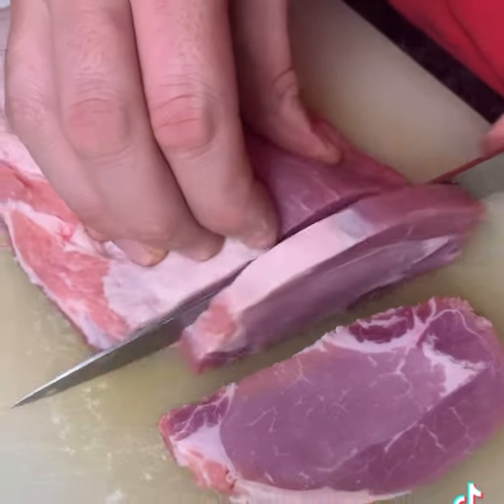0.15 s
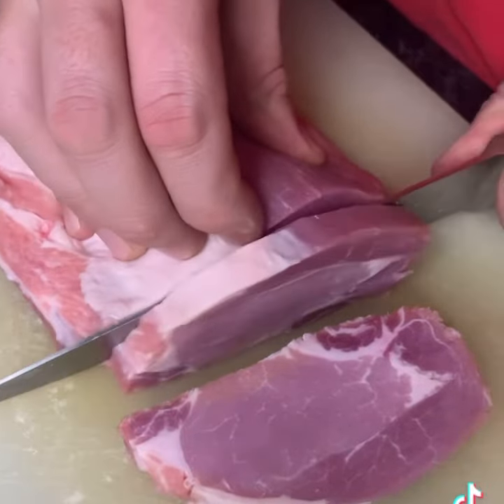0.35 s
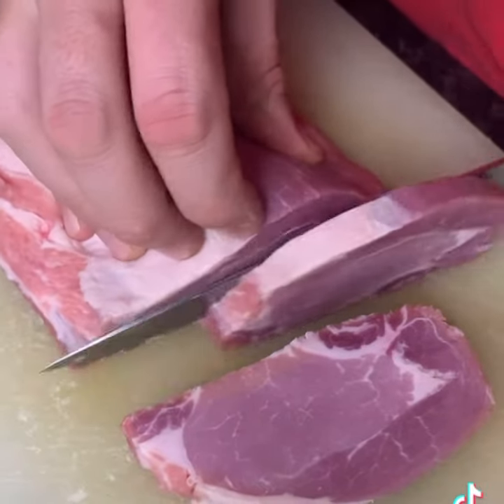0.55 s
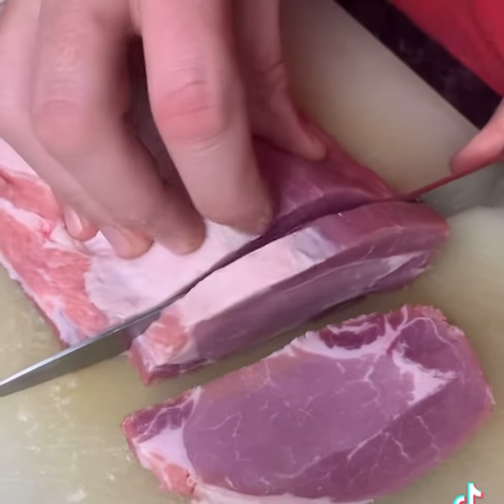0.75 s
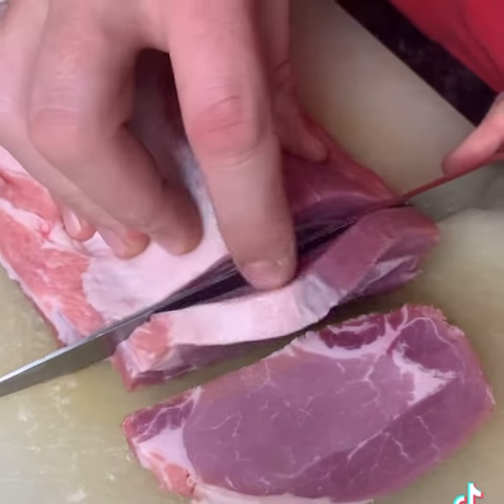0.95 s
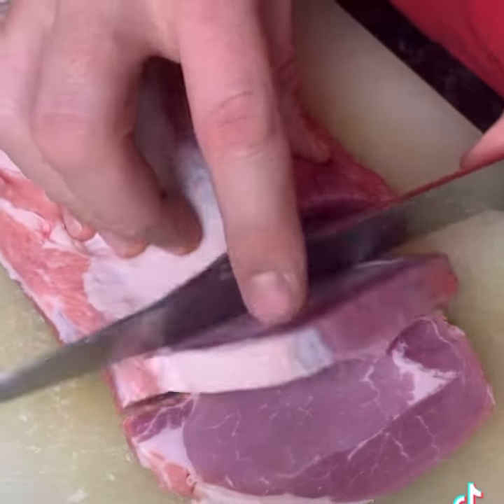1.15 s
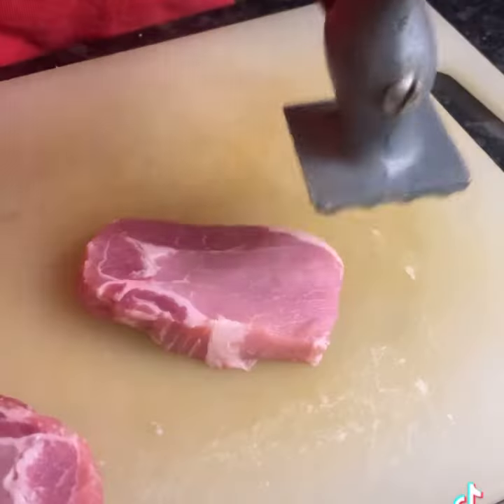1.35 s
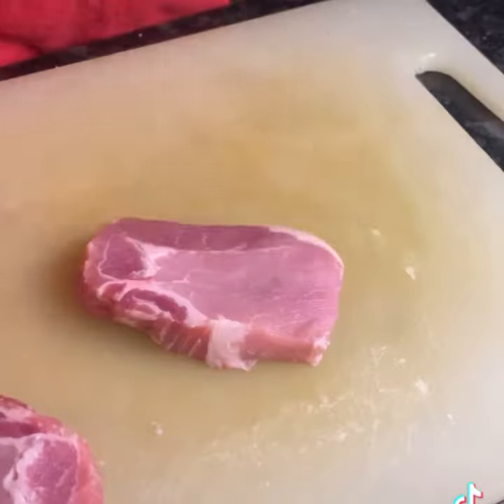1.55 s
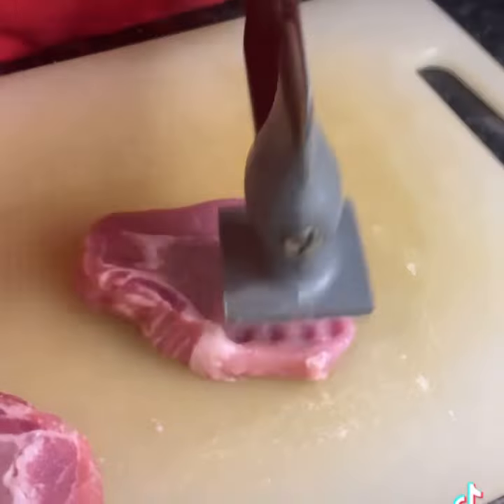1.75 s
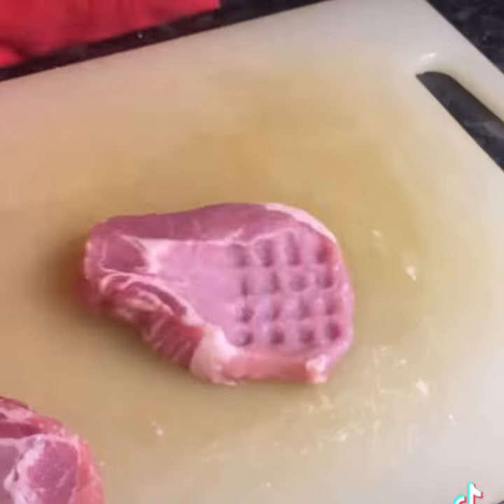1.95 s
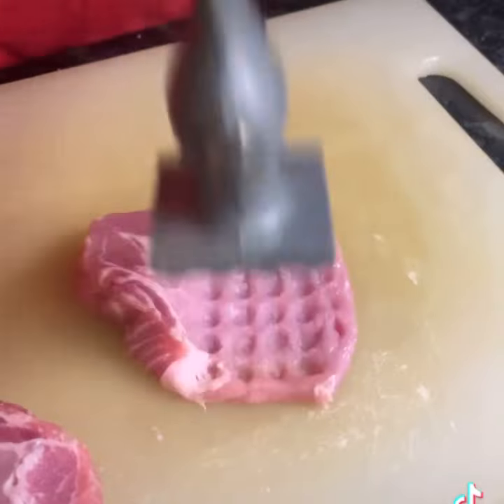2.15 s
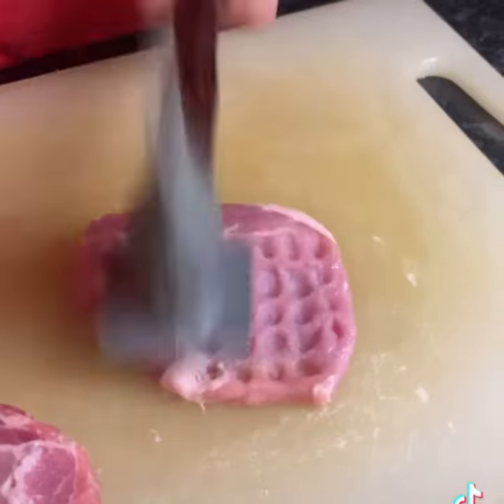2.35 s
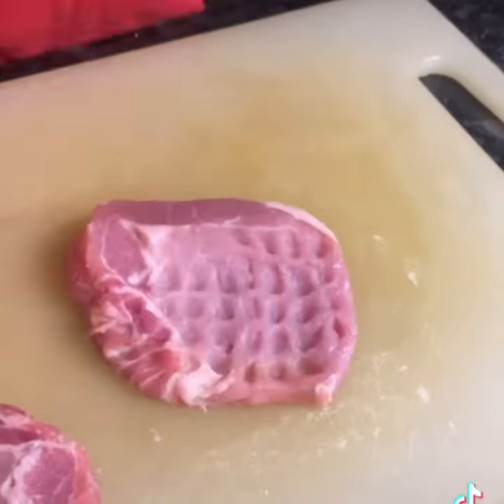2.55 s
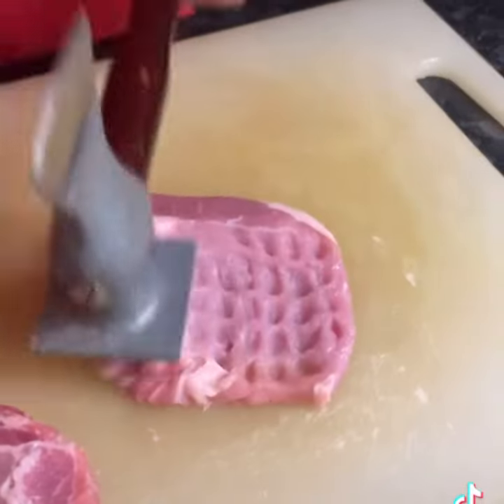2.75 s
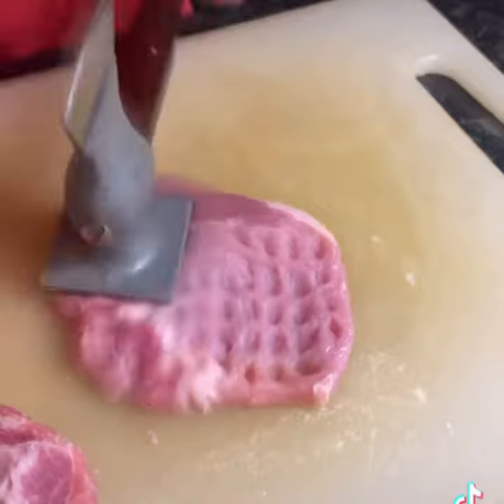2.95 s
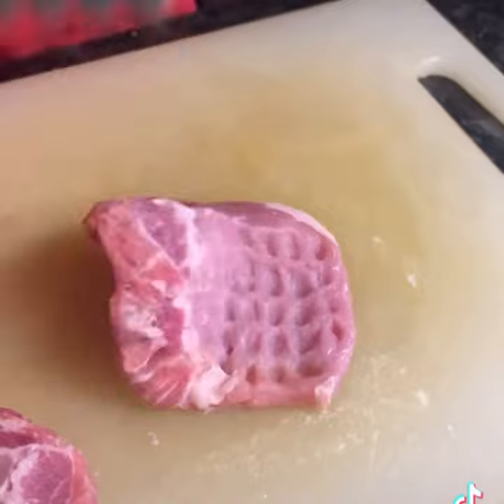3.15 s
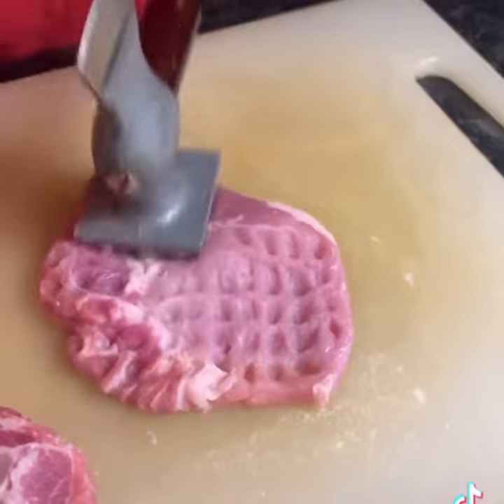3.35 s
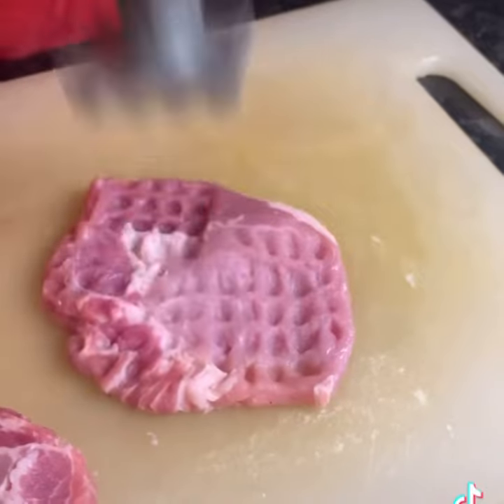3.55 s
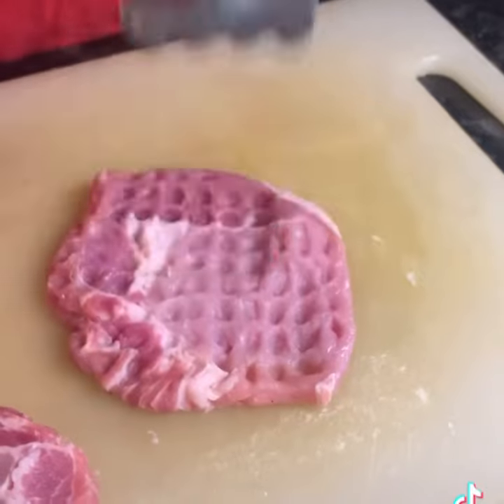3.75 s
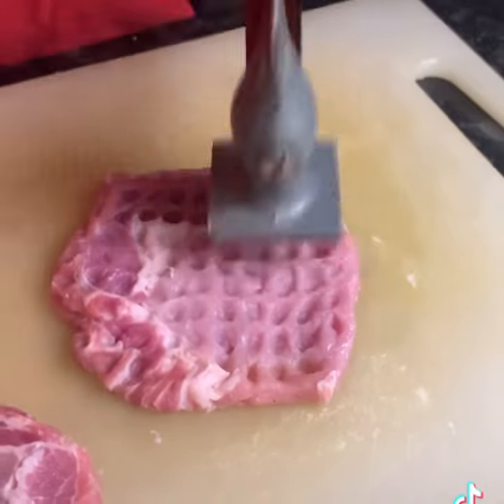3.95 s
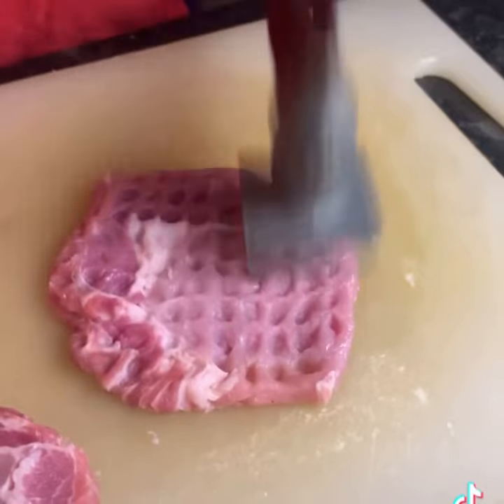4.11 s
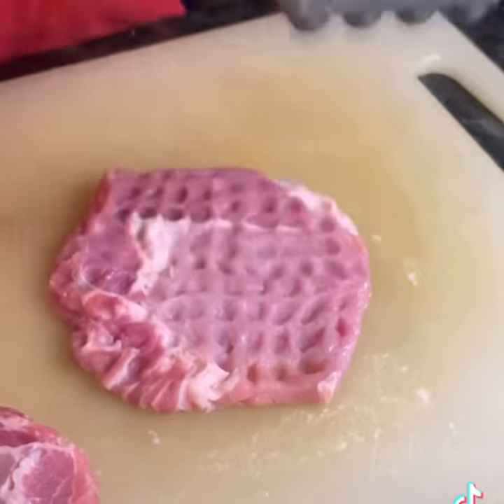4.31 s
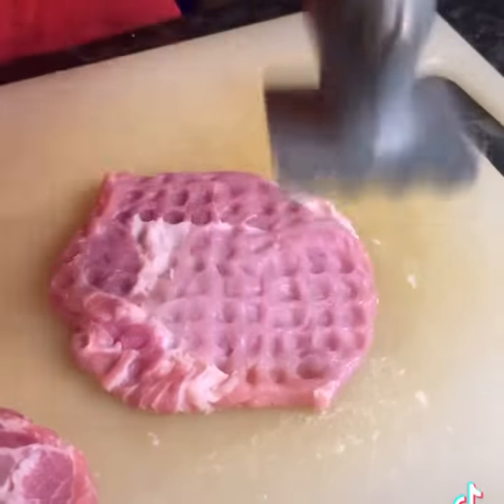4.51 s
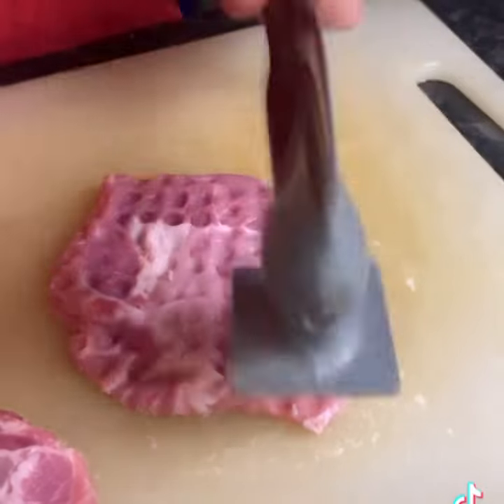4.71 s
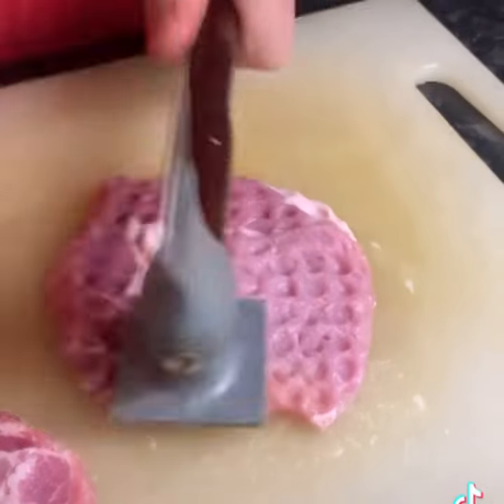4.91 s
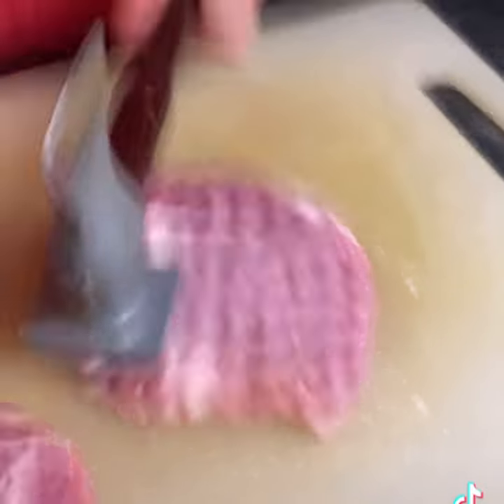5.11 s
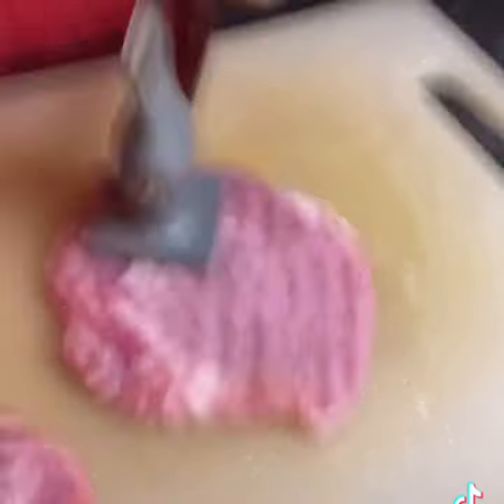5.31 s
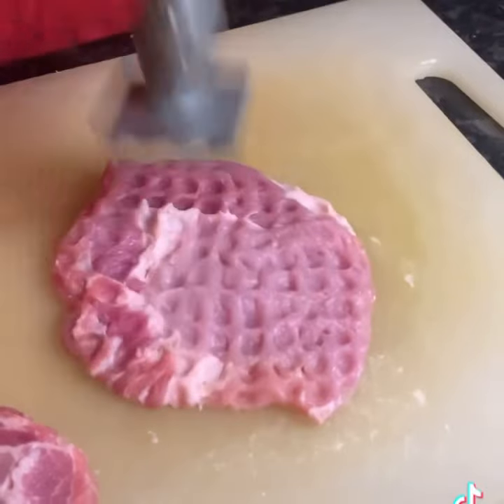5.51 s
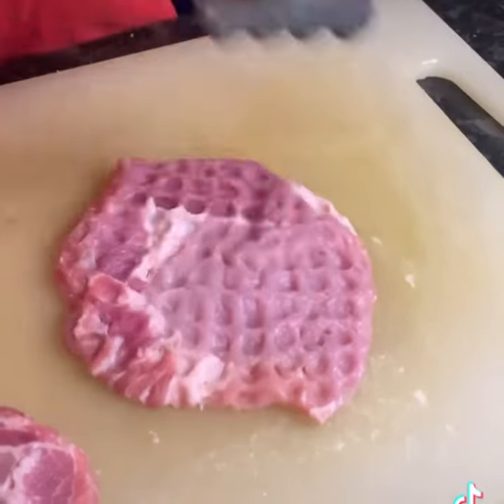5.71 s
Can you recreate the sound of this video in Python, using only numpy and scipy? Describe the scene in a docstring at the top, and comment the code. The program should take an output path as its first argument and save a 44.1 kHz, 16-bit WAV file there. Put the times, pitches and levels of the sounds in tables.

```python
"""In a small kitchen, a knife slices raw pork over a low hum; then a toothed metal mallet pounds it sixteen times.
Each blow adds shaped noise (lead-in, slap, juice), two short resonances (air pocket, board knock), damped modes
of the plastic board and counter, and a thump of falling pitch. Decaying noise supplies the kitchen's answer.
Two close microphone ports hear it; a limiter squashes the blows and pushes the hum down between them."""
import sys
import numpy as np
from scipy import signal
from scipy.fft import rfft, irfft, next_fast_len
from scipy.io import wavfile
from scipy.ndimage import uniform_filter1d, minimum_filter1d

SR = 44100
rng = np.random.default_rng(int(sys.argv[2]) if len(sys.argv) > 2 else 0)


def generate_wav(sig):
    """Save sig (samples, or channels by samples) to the path in sys.argv[1] as 16-bit PCM at SR."""
    pcm = np.round(np.clip(np.atleast_2d(sig).T, -1, 1) * 32767).astype(np.int16)
    wavfile.write(sys.argv[1], SR, pcm)


N = 258847
TIME = np.arange(N) / SR


# mallet blows; the spot where the head lands sets the meat and both pitches: (time [s], relative force [dB],
# thickness [0-1], juiciness [0-1], knock of the board [Hz], air pocket under the head [Hz])
BLOWS = [(1.5757, 12, 0.33, 0.28, 773.4, 1830), (1.9258, 14, 0.61, 0.36, 1018, 1317),
         (2.256, 8.5, 1, 0.09, 748.8, 1929), (2.5549, 14, 0.99, 0.01, 768.8, 1896),
         (2.8526, 15, 0.55, 0.41, 771, 1434), (3.1528, 13, 1, 0.47, 784.6, 1509),
         (3.4835, 15, 0.6, 0.4, 755, 2384), (3.7583, 14, 0.47, 0.41, 914.6, 1435),
         (4.022, 13.6, .15, .7, 716, 2143), (4.2773, 13, 0.19, 0.9, 901, 1458),
         (4.5237, 13.8, .15, .03, 715, 1326), (4.7577, 14, 0.39, 0.81, 759, 2093),
         (4.9913, 14, 0.95, 0, 772.3, 1469), (5.208, 12.5, 0.58, 0.98, 764, 1718),
         (5.4431, 12.5, 0.22, 0.48, 1009, 1217), (5.671, 13.5, 0.21, 0.83, 685, 2122)]
# parts of a blow on thin, dry meat: (relative level [dB], delay to peak [s], 60 dB rise [s], t60 [s])
# lead-in: noise that swells just before the slap
LEAD_IN = (-27, -.003, .038, .07)
FACE = (-4.7, .002, .01, .036)
POCKET = (-15, .002, .0155, .022)
KNOCK = (-7, .004, .02, .042)
JUICE = (-19, .0002, .0137, .057)
# spectrum of the slap and lead-in: (frequency [Hz], relative level per Hz [dB])
SLAP = [(150, -29), (260, -1), (420, -1.5), (800, 0), (1050, -4), (1300, -4), (1600, -4.5), (2100, -3),
        (2600, -6.5), (3300, -8), (4300, -8.5), (6500, -25), (12000, -55.5)]
# spectrum of spraying juice and wet ticks: (frequency [Hz], relative level per Hz [dB])
SPRAY = [(2000, -3), (4500, -9.5), (6500, 3), (9500, 0.5), (11500, -2), (13000, -12.5), (15000, -3.5),
         (16500, -31)]
# likeness of the two ports for the blows' direct sound: (frequency [Hz], correlation [-1 to 1])
ALIKE_DIRECT = [(300, 0.85), (800, 0.56), (1800, 0.653), (3500, 0.282), (5000, 0.926), (8500, 1)]
# gain change from thin to thick meat [dB]: heavier thump, stronger pocket, softer slap
THICK_THUMP_DB, THICK_POCKET_DB, THICK_SLAP_DB = 3, 11.5, -3
# blows on thick meat have a louder lead-in, and the meat shields the board [dB]
THICK_LEAD_IN_DB, THICK_BOARD_DB = 5.5, -4.5
# gain change from dry to juicy meat [dB]: more spray, a weaker knock
JUICY_SPRAY_DB, JUICY_KNOCK_DB = 5.5, -6.5
# the room throws the thump back
ECHO_S, ECHO_DB = .041, -18


def mallet():
    """Impact excitation: after a lead-in the face slaps, juice sprays, and board and counter take the blow."""
    out = np.zeros((2, N))
    t = np.arange(-SR // 25, SR // 3) / SR
    n = len(t)
    for s, force_db, thick, juicy, knock_hz, pocket_hz in BLOWS:
        lead_in = amp(THICK_LEAD_IN_DB * thick) * noise(SLAP, n, ALIKE_DIRECT) * burst(t, *LEAD_IN)
        slap = amp(THICK_SLAP_DB * thick) * noise(SLAP, n, ALIKE_DIRECT) * burst(t, *FACE)
        pocket = resonance(t, pocket_hz, port_spread=.49) * burst(t, *POCKET)
        pocket *= amp(THICK_POCKET_DB * thick)
        knock = resonance(t, knock_hz, port_spread=.47) * burst(t, *KNOCK)
        knock *= amp(JUICY_KNOCK_DB * juicy)
        # juice bursts out in tiny uneven spurts
        spray = uneven(n, depth_db=5.0, size=30) * noise(SPRAY, n) * burst(t, *JUICE)
        spray *= amp(JUICY_SPRAY_DB * juicy)
        # each port hears its own blend of the board's modes
        board = np.array([board_modes(t - .0045, scatter_db=1.85) for port in range(2)])
        board *= amp(THICK_BOARD_DB * thick - 16.5)
        counter = amp(-1.5) * counter_modes(t - .0013)
        low = amp(3.5) * thump(t - .00356) + amp(ECHO_DB) * thump(t - ECHO_S) + counter
        low *= amp(THICK_THUMP_DB * thick - 2.0)
        # the smack spreads through the room; the ringing stays mostly near the board
        smack, body = lead_in + slap + spray - board, pocket + knock
        answer = kitchen(smack + amp(-6.0) * body + amp(-6) * low)
        add(out, s + t[0], amp(force_db) * (smack + body + low + answer))
    return out


def thump(t, start_hz=203.7, rest_hz=73, glide_s=0.00847, attack_s=0.00795, t60=0.07656,
          contact_s=0.02285, release_s=0.00134):
    """Driven motion of board and counter: pitch falls as the meat yields, until the head comes to rest."""
    u = np.maximum(t, 0)
    # integral of a frequency that relaxes exponentially to rest_hz
    cycles = rest_hz * u + (start_hz - rest_hz) * glide_s * (1 - np.exp(-u / glide_s))
    pressed = .5 - .5 * np.tanh((u - contact_s) / release_s)
    envelope = (1 - np.exp(-u / attack_s)) * amp(-60 * u / t60) * pressed
    return -np.sin(2 * np.pi * cycles) * envelope


# modes of the plastic board on the counter: (frequency [Hz], relative level [dB], t60 [s])
BOARD = [(310.3, -1.5, 0.1096), (377.3, -6.5, 0.0532), (454.9, -1, 0.0729), (569.2, -0.5, 0.0675),
         (755.8, -5, 0.1026), (963.4, 4, 0.043), (1472, -6, 0.05), (1986, -14, 0.014)]


def board_modes(t, scatter_db):
    """Modal vibration: the struck board rings as a sum of damped modes."""
    return ring(t, BOARD, scatter_db)


# low modes of the counter: (frequency [Hz], relative level [dB], t60 [s])
COUNTER = [(40, -31, 0.084), (86.62, -21, 0.401), (122.78, -27.5, 0.405), (173.1, -22, 0.2715)]


def counter_modes(t):
    """Modal vibration: the counter rings below the board."""
    return ring(t, COUNTER, scatter_db=1.14)


def resonance(t, hz, port_spread):
    """Simple resonance: one sinusoid with a slightly different phase [rad] at each port."""
    phase = rng.uniform(0, 2 * np.pi) + port_spread * rng.standard_normal((2, 1))
    return np.sin(2 * np.pi * hz * t + phase)


# sharp cracks as a tooth breaks through or a wet film bursts: (time [s], relative level [dB])
CRACKS = [(1.5738, 4), (1.9274, 5), (3.152, 1.5), (4.0224, -0.5), (4.2746, -7.5), (4.7554, -0.5)]


def cracks():
    """Sudden release: very short bright noise snaps on the front of some blows."""
    out = np.zeros((2, N))
    t = np.arange(SR // 50) / SR
    for s, db in CRACKS:
        snap = noise([(2000, -2.5), (6000, -10.5), (15000, -2.5)], len(t))
        add(out, s, amp(db) * snap * amp(-60 * t / 0.00264))
    return out


# knife strokes through the meat: (time [s], relative level [dB], Gaussian width [s])
STROKES = [(.03, -49, 0.045), (.2, -45, 0.0406), (.49, -53, 0.054)]
# spectrum of the blade: (frequency [Hz], relative level per Hz [dB])
BLADE = [(500, -24.5), (1500, 1), (2400, -1), (4000, -6), (9000, -6), (15000, -16)]
# small wet ticks of the meat: (time [s], relative level [dB], Gaussian width [s])
TICKS = [(.79, -50.5, 0.0047), (.918, -41.5, 0.00207), (1.425, -42.5, 0.00246), (2.42, -38.5, 0.0049),
         (5.825, -37, 0.0065)]


def cutting():
    """Friction noise: the blade's strokes and the meat's wet ticks, both uneven in level."""
    strokes = swells(STROKES) * uneven(N, depth_db=2, size=500) * patchy(noise(BLADE, N), depth_db=2)
    ticks = swells(TICKS) * noise(SPRAY, N)
    return uneven(N, depth_db=1.0, size=90) * (strokes + ticks)


# the board is nudged as the meat shifts or clings to the mallet:
# (time [s], relative level [dB], Gaussian width [s])
NUDGES = [(1.311, -25.5, 0.0095), (1.45, -27, 0.0137), (1.51, -31.5, 0.0067), (1.815, -26.5, 0.0206),
          (2.228, -32, 0.007), (4.214, -16.5, 0.00844), (4.557, -16.5, 0.0076), (5.602, -28, 0.0097)]
# spectrum of a soft push on the board: (frequency [Hz], relative level per Hz [dB])
PUSH = [(180, -12), (310, 6), (450, -5.5), (800, -5), (1000, -12.5), (3000, -33.5)]


def nudges():
    """Forced vibration: soft pushes rustle and, convolved with the board's modes, make it drone."""
    board = board_modes(np.arange(SR // 4) / SR, scatter_db=3.0)
    push = noise(PUSH, N)
    drone = unit(signal.fftconvolve(push, board[None], axes=1)[:, :N])
    return swells(NUDGES) * (0.88 * drone + 0.224 * push)


def handling():
    """Superposition of direct and diffuse sound: cutting and nudges with the kitchen's answer."""
    direct = cutting() + nudges()
    return direct + kitchen(direct)


# decay of the kitchen: (frequency [Hz], t60 [s])
DECAY = [(100, 0.0046), (400, 0.3121), (1500, 0.3168), (3000, 0.2155), (9000, 0.219), (15000, 0.13)]
# strength of the kitchen's answer: (frequency [Hz], relative level [dB])
WET = [(60, -16), (150, 1), (400, -13), (1500, -11), (5000, -12), (15000, -14)]


def kitchen(x):
    """Diffuse reverberation: a fresh noise tail, each frequency dying at its own speed."""
    hz, t, z = signal.stft(noise([(20, 0), (20000, 0)], SR // 3), SR, nperseg=256)
    t60 = along(DECAY, hz)[:, None]
    decay = amp(along(WET, hz)[:, None] - 60 * t / t60)
    # evens out the tail's strength between short and long decays
    decay *= np.sqrt(np.log(1e6) / (t60 * SR))
    onset = 1 - np.exp(-t / 0.00211)
    tail = signal.istft(z * decay * onset, SR, nperseg=256)[1]
    return signal.fftconvolve(x, tail, axes=1)[:, :x.shape[-1]]


# spectra of hum and hiss during slicing: (frequency [Hz], relative level per Hz [dB])
SLICING_HUM = [(15, -47), (25, -25), (69, -2), (119, -2.5), (165, -12.5), (207, -5), (306, -20.5),
               (383, -20.5), (465, -30.5), (657, -26), (900, -54.5), (1170, -84), (1980, -120)]
SLICING_HISS = [(470, -33), (800, 3), (2440, -6), (3600, -1), (5380, -9), (6740, -1.5), (8990, -1),
                (12300, -8), (16000, -20.5)]
# spectra of hum, hiss and a faint narrow whine during pounding: (frequency [Hz], relative level per Hz [dB])
HUM = [(15, -41.5), (25, -37), (59, 3.5), (102, 2), (221, -8.5), (257, -19.5), (328, -9), (400, -28.5),
       (520, -54), (880, -120)]
HISS = [(100, -24), (250, 6.5), (310, 2.5), (450, 0.5), (610, 1), (700, 3), (1000, 1), (1250, -2),
        (2000, 0.5), (2700, -2), (4200, -2.5), (5500, -7), (9000, -13.5), (12000, -17.5), (15500, -18.5)]
WHINE = [(560, -50.5), (595, -2), (620, -9.5), (660, -41.5), (710, -37.5), (752, -5.5), (778, 1.5),
         (825, -57.5)]
POUNDING_FROM = 1.138  # s
HUM_DB, HISS_DB, WHINE_DB = -30.5, -38.5, -43  # while pounding, ahead of port balance and limiter


def room_noise():
    """Stationary noise: hum, two wavering lines and hiss while slicing; hum, hiss and whine while pounding."""
    lines = noise([(102, -42), (114, 8.0), (126, -47.5), (188, -46.5), (205, 1.5), (224, -52.5)], N)
    slicing = amp(-33.5) * noise(SLICING_HUM, N) + amp(-38.0) * lines
    slicing += amp(-53.0) * noise(SLICING_HISS, N)
    pounding = amp(HUM_DB) * noise(HUM, N) + amp(WHINE_DB) * noise(WHINE, N)
    pounding += amp(HISS_DB) * patchy(noise(HISS, N), depth_db=1.0)
    return np.where(TIME < POUNDING_FROM, slicing, pounding)


# likeness of the two ports, unless a source has its own: (frequency [Hz], correlation [-1 to 1])
ALIKE = [(150, 1), (300, 0.842), (600, 0.061), (1500, 0.214), (3500, 0.022), (5000, 0.937), (8500, 1),
         (15000, 1)]


def noise(spectrum, size, alike=ALIKE):
    """Partial coherence: coloured noise of rms 1 whose mid and side shares set the port correlation."""
    def mid_side(hz):
        angle = np.arccos(np.clip(along(alike, hz), -1, 1)) / 2
        return amp(along(spectrum, hz)) * [np.cos(angle), np.sin(angle)]
    mid, side = filtered(rng.standard_normal((2, size)), mid_side)
    return unit(np.array([mid + side, mid - side]))


def ring(t, modes, scatter_db):
    """Modal superposition: damped sinusoids set off at t = 0, each with a random change of strength."""
    u = np.maximum(t, 0)
    total = 0
    for hz, db, t60 in modes:
        strength_db = db + scatter_db * rng.standard_normal()
        total = total + amp(strength_db - 60 * u / t60) * np.sin(2 * np.pi * hz * u)
    return total


def burst(t, db, delay, rise, t60):
    """Exponential growth and decay: swells by 60 dB in `rise` seconds up to its peak, then dies."""
    return amp(db - 60 * np.maximum((delay - t) / rise, (t - delay) / t60))


def swells(rows):
    """Gaussian envelopes: one bell for each (time [s], level [dB], width [s]) row."""
    return sum(amp(db) * np.exp(-.5 * ((TIME - s) / width) ** 2) for s, db, width in rows)


def uneven(n, depth_db, size):
    """Random amplitude modulation: a gain of rms 1 that changes about every `size` samples."""
    drift = uniform_filter1d(rng.standard_normal(n), size=size)
    return unit(amp(depth_db * unit(drift)))


def patchy(x, depth_db):
    """Time-frequency modulation: patches of the spectrum swell and fade on their own."""
    z = signal.stft(x, nperseg=1024)[2]
    field = uniform_filter1d(rng.standard_normal(z.shape[1:]), size=7, axis=0)
    field = uniform_filter1d(field, size=6, axis=1)
    return unit(signal.istft(z * amp(depth_db * unit(field)), nperseg=1024)[1][:, :N])


def filtered(x, response):
    """Linear filtering: the spectrum of x times a response of frequency."""
    n = x.shape[-1]
    m = next_fast_len(n + SR // 8)
    return irfft(rfft(x, m) * response(np.fft.rfftfreq(m, 1 / SR)), m)[..., :n]


def along(points, hz):
    """Logarithmic frequency scale: interpolate (frequency [Hz], value) points along it."""
    f, v = np.transpose(points)
    return np.interp(np.log(hz + 1), np.log(f), v)


def amp(db):
    """Level definition: decibels to amplitude gain."""
    return 10 ** (np.asarray(db) / 20)


def unit(x):
    """Effective value: scale to rms 1."""
    return x / np.sqrt(np.mean(x ** 2) + 1e-20)


def add(track, s, sound):
    """Superposition: mix a sound into the track from time s."""
    part = track[:, round(s * SR):][:, :sound.shape[-1]]
    part += sound[:, :part.shape[-1]]


def scene():
    """Time and level differences: sound reaches the left port first; the right hears lower ranges louder."""
    def ports(hz):
        right_db = along([(100, 2.5), (1000, 2), (2500, 1.0), (5000, 0)], hz)
        # half the 0.00011866 s delay is an advance at the left, half a lag at the right
        delay = np.exp(1j * np.pi * np.outer([1, -1], hz) * 0.00011866)
        return amp(np.outer([-.5, .5], right_db)) * delay
    return filtered(mallet() + cracks() + handling() + room_noise(), ports)


# rms ceiling, span of the level meter, and how long the gain is held down after a peak
CEILING_DB, METER_S, HOLD_S = -7.5, 0.01255, 0.1169
# first speed of recovery, which slows by a factor e for every SLOWING_S spent holding
RECOVERY_DB_PER_S, SLOWING_S = 349.5, 0.198


def limiter(x):
    """Gain reduction: each blow ducks everything; the hum swells back after the first few, then stays down."""
    power = np.abs(uniform_filter1d(np.mean(x ** 2, axis=0), round(METER_S * SR)))
    needed_db = np.minimum(CEILING_DB - 10 * np.log10(power + 1e-20), 0)
    hold = round(HOLD_S * SR)
    # the window looks back, so a reduction outlasts its peak
    held_db = minimum_filter1d(needed_db, hold, origin=(hold - 1) // 2)
    busy_s = np.cumsum(held_db < 0) / SR
    recovered_db = np.cumsum(RECOVERY_DB_PER_S * np.exp(-busy_s / SLOWING_S)) / SR
    gain_db = np.minimum.accumulate(held_db - recovered_db) + recovered_db
    return x * amp(gain_db)


TOP_HZ, EDGE_HZ = 16600, 800  # end of the band and width of its slope


def record(dry, top=0.88, hardness=4):
    """Limiting, saturation and band limiting: blows are ducked, the level dips once, peaks are rounded."""
    dip = (TIME > 1.254) & (TIME < 1.287)
    x = limiter(dry) * np.where(dip, amp(-38.0), 1)
    x = x / (1 + np.abs(x / top) ** hardness) ** (1 / hardness)
    return filtered(x, lambda hz: np.clip((TOP_HZ - hz) / EDGE_HZ, 0, 1))


dry = scene()
out = record(dry)
generate_wav(out)
```